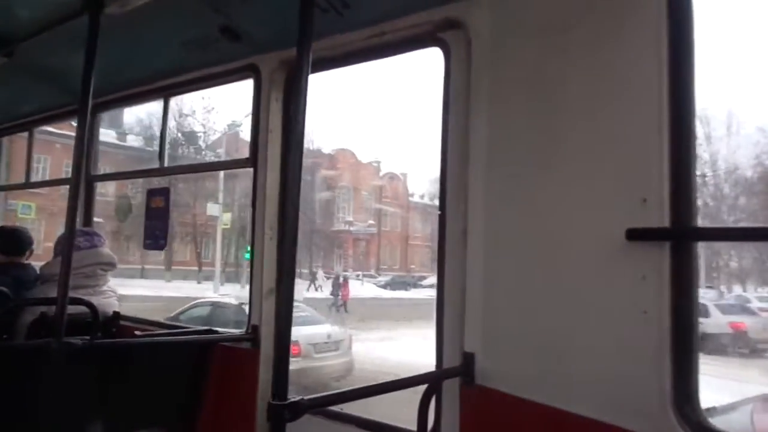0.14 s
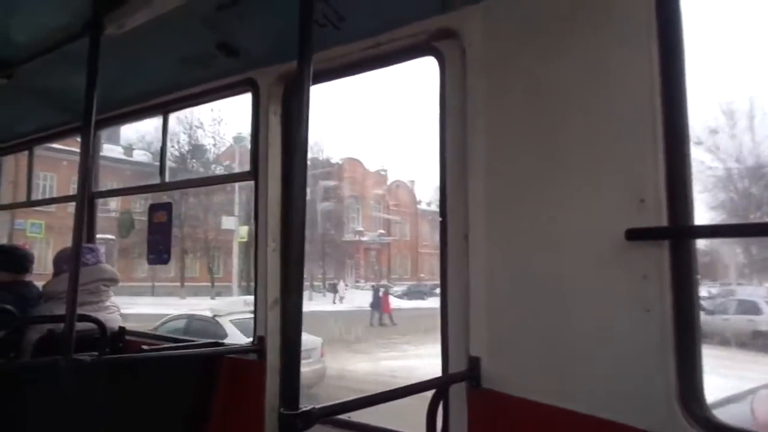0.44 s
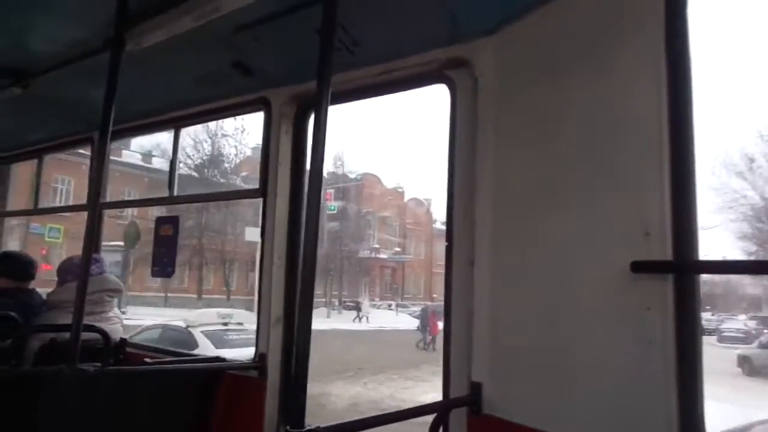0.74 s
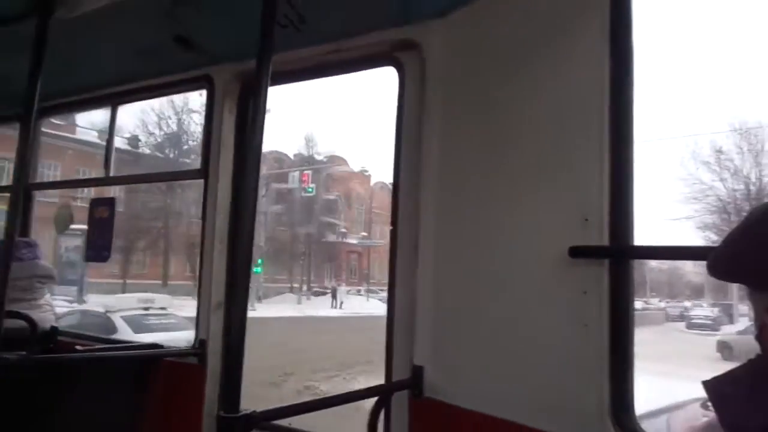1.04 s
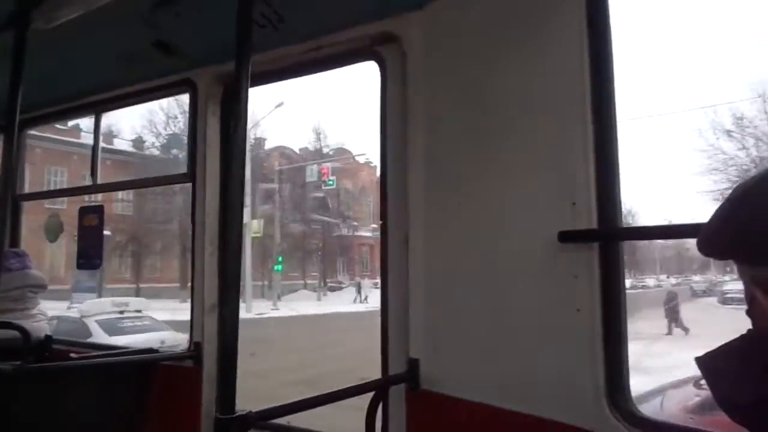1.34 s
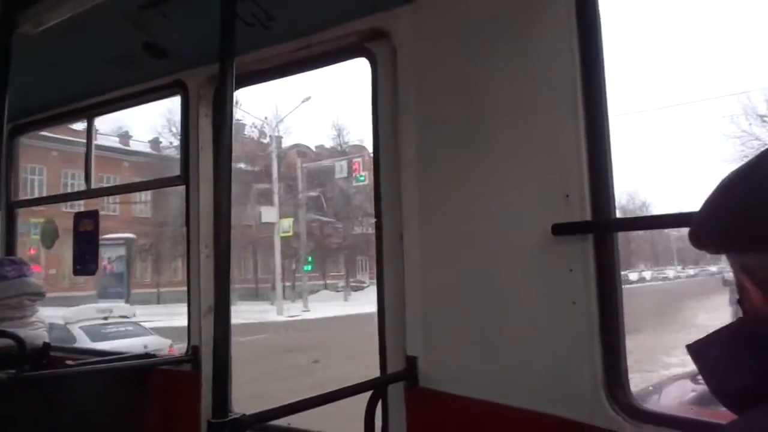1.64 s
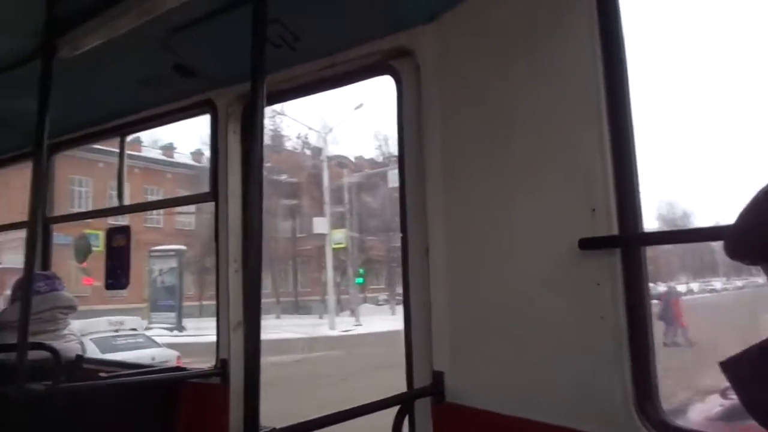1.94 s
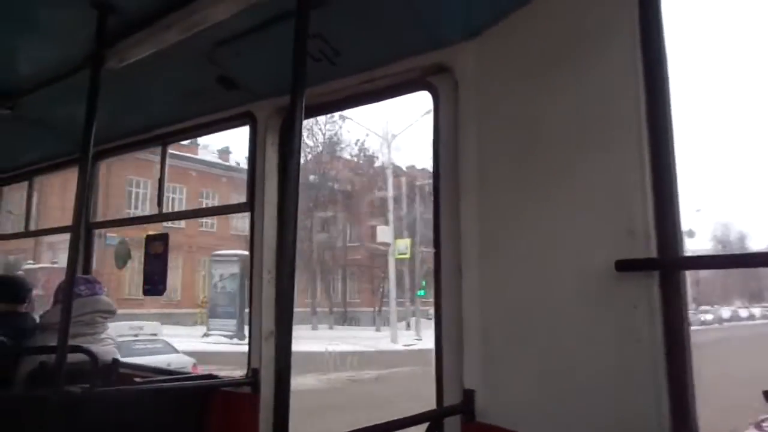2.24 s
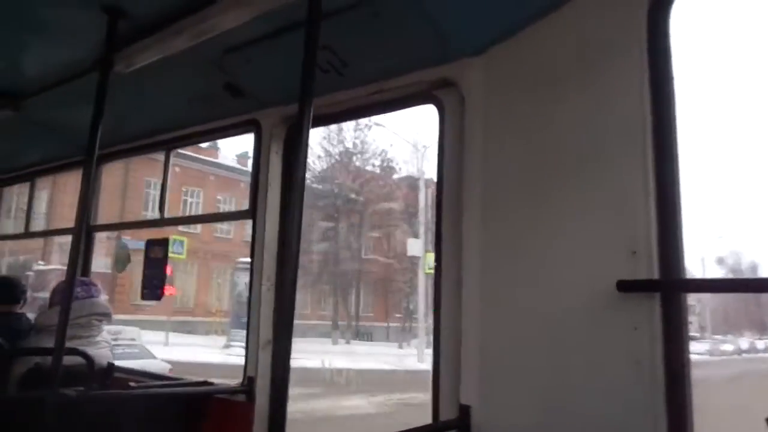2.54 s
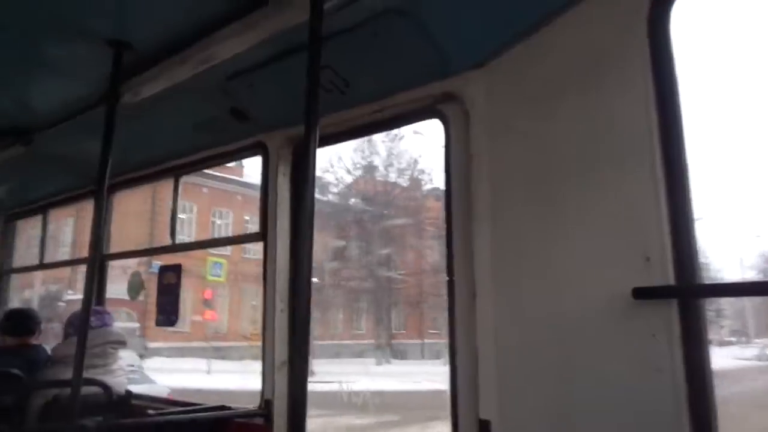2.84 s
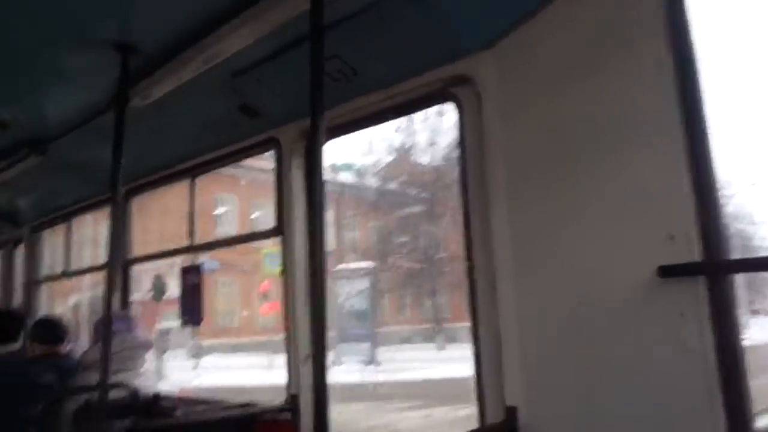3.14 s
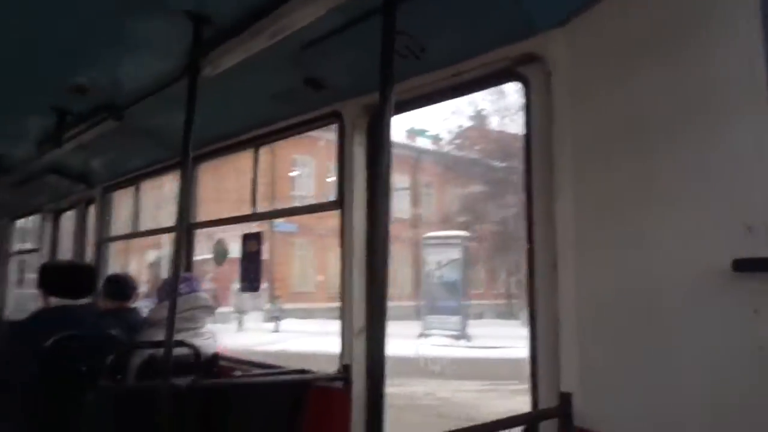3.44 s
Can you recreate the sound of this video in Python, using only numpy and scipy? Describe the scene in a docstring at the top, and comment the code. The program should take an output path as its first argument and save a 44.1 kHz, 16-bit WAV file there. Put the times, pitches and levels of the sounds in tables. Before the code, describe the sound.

A tram rumbles along rough track, heard from inside, with a low booming drone and wheel roar throughout. A faint motor whine fades out by 0.8 seconds. Windows and panels rattle and knock in short, irregular bursts. From about 0.9 seconds, wheels thud through the floor, hardest near 2.2, 2.5 and 3 seconds. The roar and rattling grow louder from 2 seconds to the end at about 3.6.

```python
"""Inside a tram on rough track, almost in mono. From the start, floor and walls boom at three low
resonances and the wheels roar; a faint motor whine is gone by 0.8 s. Throughout, jolts over rail
joints shake windows and panels into short rattles and knocks. From 0.9 s, wheel drops thud through
the floor. Roar and rattles grow louder towards the end."""
import sys
import numpy as np
from scipy import signal
from scipy.fft import rfft, irfft, next_fast_len
from scipy.io import wavfile
from scipy.ndimage import uniform_filter1d, map_coordinates

SR = 44100
rng = np.random.default_rng(int(sys.argv[2]) if len(sys.argv) > 2 else 0)


def transcribe(signal):
    """Save signal, clipped to [-1, 1], as a 16-bit WAV file at the path in sys.argv[1]."""
    frames = np.atleast_2d(signal).T
    limited = np.clip(frames, -1, 1)
    pcm = np.round(limited * 32767).astype(np.int16)
    wavfile.write(sys.argv[1], SR, pcm)


N = 158760

# floor and wall resonances: f/Hz, width/Hz
BOOM_MODES = [(67, 14.3), (89, 15), (113, 15.1)]
# their envelopes: t/s, then level/dB of each mode
BOOM_LEVELS = [(0.0, -56, -25, -37), (0.08, -36, -28, -33), (0.33, -27, -55, -36), (0.39, -39, -38, -47),
               (0.63, -26.5, -44, -27), (0.73, -52, -44, -30), (0.89, -22, -30, -31),
               (1.08, -28, -26.5, -33), (1.22, -28, -29, -24.5), (1.28, -30, -32, -26.5),
               (1.42, -27.5, -26, -35), (1.69, -21, -33, -26), (1.79, -24, -26, -29), (1.89, -15, -39, -29),
               (1.96, -32, -38, -25), (2.07, -18, -21, -23), (2.12, -24.5, -22, -28),
               (2.29, -21.5, -23, -14.5), (2.46, -19, -28.5, -40), (2.51, -29, -28, -17.5),
               (2.58, -19, -14.5, -23), (2.63, -31, -40, -24), (2.78, -25, -39, -17), (3.02, -33, -22, -27),
               (3.09, -21, -38, -12), (3.25, -21, -22.5, -28), (3.43, -24, -20, -22),
               (3.47, -37, -25, -14.5), (3.6, -19, -23, -25)]
# rolling noise: t/s, roar level/dB, hiss level/dB
ROAR_LEVELS = [(0, -28, -46), (.3, -27.5, -50), (.55, -26, -45.5), (.82, -26.5, -48), (1.07, -23.5, -43.5),
               (1.38, -25, -47.5), (1.62, -24.5, -44), (1.95, -23, -44), (2.17, -20, -41), (2.46, -21, -42),
               (2.78, -18, -40), (3.02, -17, -42), (3.17, -18, -35), (3.55, -21, -47), (3.6, -17, -48)]
# spectra of wheel roar, low rumble and hiss: f/Hz, relative density/dB
WHEEL_SPECTRUM = [(76, -85), (130, -8), (221, -12), (319, -8.5), (476, -9.5), (746, -12.5), (1100, -16.5),
                  (1270, -19.5), (2520, -22), (6000, -38), (7800, -47.5), (13200, -120)]
RUMBLE_SPECTRUM = [(8, -40), (20, 2), (28, -2), (40, 2), (52, -2), (90, -14.5), (130, 0), (160, -3.5),
                   (210, -10), (500, -120)]
HISS_SPECTRUM = [(1200, -120), (2000, -13), (3000, -2.5), (4300, -5), (6500, -3.5), (9000, -7),
                 (11500, -6.5), (13000, -16), (14200, -13), (15800, -28)]
# cabin shell resonances: f/Hz, width/Hz, lift/dB
SHELL_MODES = [(269.5, 33, 2.5), (304.4, 24, 4.5), (392.7, 8, 5), (487, 11, 3), (722, 70, 1.5),
               (1125, 45, 3), (1367, 320, 4)]
# motor tones: f/Hz, width/Hz, level/dB
MOTOR_TONES = [(743, 11, -38), (1050, 15, -38.5)]
# rattle bursts: peak t/s, level/dB, treble gain/dB, rise/s, fall/s (both to 1/e)
JOLT_BURSTS = [(.137, -23, -6.5, 0.053, 0.079), (0.465, -23, -4, 0.043, 0.07),
               (.61, -25.5, -7, 0.026, 0.04), (.905, -18.5, -7, 0.028, 0.049),
               (0.954, -18.5, -1.5, 0.027, 0.049), (1.12, -29, 5.5, 0.011, 0.034),
               (1.275, -28.5, 0.5, 0.042, 0.024), (1.73, -30, 2.5, 0.02, 0.068),
               (1.88, -24, -4, 0.067, 0.11), (2.019, -20.5, -1, 0.01, 0.11),
               (2.243, -15, -1.5, 0.038, 0.041), (2.315, -14.5, -4.5, 0.058, 0.13),
               (2.554, -15, 3.5, 0.05, 0.061), (2.66, -19, -1, 0.027, 0.046), (2.89, -18, -7, 0.08, 0.047),
               (2.97, -21, 0.5, 0.059, 0.053), (3.06, -14, -12, 0.043, 0.057),
               (3.115, -12.5, -5, 0.022, 0.018), (3.24, -15, -1.5, 0.094, 0.044),
               (3.34, -15, -1, 0.066, 0.094), (3.402, -14, 1, 0.018, 0.018), (3.48, -17, 3.5, 0.056, 0.093),
               (3.6, -18, -0.5, 0.037, 0.055)]
# rattling panels: f/Hz, relative density/dB
PANEL_SPECTRUM = [(80, -120), (150, -5.5), (250, -7.5), (385, -6), (800, -7.5), (1300, -12), (2000, -13.5),
                  (3500, -20.5), (5500, -28.5), (8500, -31.5), (11500, -32.5), (13000, -39), (14200, -48),
                  (15800, -54)]
# loose panels struck: t/s, level/dB, f/Hz
PANEL_KNOCKS = [(0.084, -13, 307), (.601, -10, 380), (.946, -9, 470), (2.236, -12, 783), (2.305, -9.5, 620),
                (2.325, -3.5, 389), (2.539, -3, 403), (2.865, -5, 370), (3.042, -6, 278), (3.445, -3, 1335)]
# wheels dropping on joints: t/s, relative level/dB
WHEEL_DROPS = [(0.864, -10), (1.218, -14), (1.385, -19), (1.501, -9.5), (2.238, 0.5), (2.538, -3),
               (3.044, 0)]
# floor modes rung by a drop: f/Hz, relative level/dB, T60/s
FLOOR_MODES = [(70.3, 10, 0.044), (107, 12, 0.081), (273, -8.5, 0.23)]
# spells of wider treble: start t/s, end t/s
WIDE_SPELLS = [(1.011, 1.076), (1.25, 1.57), (1.903, 2.044), (2.7, 3.16), (3.533, 3.64)]
# filter of the left-right difference: f/Hz, gain/dB
SIDE_RESPONSE = [(100, -39.5), (1000, -25.5), (3000, -14.5), (6000, -10), (9000, 3), (12000, -1),
                 (14000, -23)]


def amp(db):
    """Level to gain."""
    return 10 ** (np.asarray(db) / 20)


def unit(x):
    """Scale to rms 1."""
    return x / np.sqrt(np.mean(x ** 2) + 1e-20)


def shape(points):
    """Response from (f/Hz, level/dB) points, log frequency axis."""
    hz, db = np.transpose(points)
    return lambda f: amp(np.interp(np.log(f + 1), np.log(hz + 1), db))


def curves(rows):
    """Each column after t/s, interpolated per sample."""
    times_s, *columns = np.transpose(rows)
    return [np.interp(np.arange(N) / SR, times_s, column) for column in columns]


def wobble(rate_hz):
    """Smooth random curve through rate_hz knots a second."""
    knots = rng.standard_normal(int(N * rate_hz / SR) + 4)
    return map_coordinates(knots, [np.arange(N) * rate_hz / SR])


def filtered(x, response):
    """Apply response(f/Hz) by FFT."""
    size = next_fast_len(N + SR // 2)
    return irfft(rfft(x, size) * response(np.fft.rfftfreq(size, 1 / SR)), size)[..., :N]


def patchy_noise(depth_db):
    """White noise with random gain patches in time and frequency."""
    spectra = signal.stft(rng.standard_normal(N + 512), nperseg=512)[2]
    patches = uniform_filter1d(rng.standard_normal(spectra.shape), size=5, axis=0)
    patches = uniform_filter1d(patches, size=6, axis=1)
    return signal.istft(spectra * amp(depth_db * unit(patches)), nperseg=512)[1][:N]


def resonance(hz, width_hz):
    """Noise ringing in one narrow resonance, rms 1."""
    noise = rng.standard_normal(N)
    return unit(filtered(noise, lambda f: (1j * f * width_hz / (hz**2 - f**2 + 1j * f * width_hz)) ** 2))


def cabin_boom(evenness=0.55):
    """Track roughness keeps three cabin modes droning, wavering in pitch and level."""
    out = np.zeros(N)
    for level_db, (hz, width_hz) in zip(curves(BOOM_LEVELS), BOOM_MODES):
        ring = resonance(hz, width_hz)
        envelope = np.abs(signal.hilbert(ring)) + 0.041
        out += amp(level_db) * unit(ring / envelope ** evenness)
    return out


def wheel_roar(rumble_db=-7, flicker_db=0.6):
    """Steel wheels on rails: roar, broad rumble below, thin hiss on top."""
    roar_db, hiss_db = curves(ROAR_LEVELS)
    wheels = unit(filtered(patchy_noise(depth_db=1.5), shape(WHEEL_SPECTRUM)))
    rumble = amp(rumble_db) * unit(filtered(rng.standard_normal(N), shape(RUMBLE_SPECTRUM)))
    hiss_gain = amp(hiss_db + flicker_db * wobble(rate_hz=14))
    hiss = unit(filtered(patchy_noise(depth_db=2.2), shape(HISS_SPECTRUM)))
    return amp(roar_db) * (wheels + rumble) + hiss_gain * hiss


def cabin_shell(x):
    """The shell lifts passing sound at its resonances."""
    def lift_db(f):
        return sum(db / (1 + (2 * (f - hz) / width_hz) ** 2) for hz, width_hz, db in SHELL_MODES)
    return filtered(x, lambda f: amp(lift_db(f)))


def motor_whine(end_s=0.78, fade_s=0.1):
    """Two fuzzy motor tones die away as the tram starts to coast."""
    fade = np.clip((end_s - np.arange(N) / SR) / fade_s, 0, 1)
    return fade * sum(amp(db) * resonance(hz, width_hz) for hz, width_hz, db in MOTOR_TONES)


def panel_rattles(ticks_per_s=2200, spread_db=5, tick_share=0.31, crossover_hz=1660):
    """Each jolt shakes the panels into a swell of dense ticks and buzz, with its own brightness."""
    ticks = np.zeros(N)
    position, polarity, rank = rng.random((int(ticks_per_s * N / SR), 3)).T
    ticks[(position * N).astype(int)] = np.sign(polarity - 0.5) * amp(-spread_db * np.log(rank + 0.02))
    noise = unit(patchy_noise(depth_db=1.5))
    drive = np.sqrt(tick_share) * unit(ticks) + np.sqrt(1 - tick_share) * noise
    buzz = unit(filtered(drive, shape(PANEL_SPECTRUM)))
    treble = filtered(buzz, lambda f: 1 / (1 + (crossover_hz / (f + 1)) ** 2))
    t = np.arange(N) / SR
    low_power, treble_power = np.zeros(N), np.zeros(N)
    for peak_s, db, treble_db, rise_s, fall_s in JOLT_BURSTS:
        from_peak = np.where(t < peak_s, (peak_s - t) / rise_s, (t - peak_s) / fall_s)
        swell = amp(db) * np.exp(-from_peak ** 1.55)  # exponent: 1 cusp, 2 bell
        low_power += swell ** 2
        treble_power += (swell * amp(treble_db)) ** 2
    return np.sqrt(low_power) * (buzz - treble) + np.sqrt(treble_power) * treble


def panel_knocks(rise_s=0.0064, t60_s=0.068):
    """A loose panel struck by a jolt rings briefly at its own pitch."""
    out, t = np.zeros(N + SR), np.arange(SR // 4) / SR
    attack = 1 - np.exp(-t / rise_s)
    for start_s, db, hz in PANEL_KNOCKS:
        ring = np.sin(2 * np.pi * (hz * t + rng.random()))
        out[round(start_s * SR):][:len(t)] += amp(db - 60 * t / t60_s) * attack * ring
    return out[:N]


def floor_thuds(gain_db=-12, scatter_db=2.7, rise_s=0.0043, highpass_hz=55):
    """A wheel drops on a joint; the floor rings briefly."""
    out, t = np.zeros(N + SR), np.arange(SR // 4) / SR
    attack = 1 - np.exp(-t / rise_s)
    for start_s, db in WHEEL_DROPS:
        ring = sum(amp(mode_db + rng.normal(0, scatter_db) - 60 * t / t60_s) * np.sin(2 * np.pi * hz * t)
                   for hz, mode_db, t60_s in FLOOR_MODES)
        out[round(start_s * SR):][:len(t)] += amp(db + gain_db) * attack * ring
    return filtered(out[:N], lambda f: 1 / (1 + (highpass_hz / (f + 1)) ** 4))


def treble_spread(centre):
    """Side signal: a phase-scrambled copy of the centre widens the treble in spells."""
    t = np.arange(N) / SR
    spells = sum((t > start_s) & (t < end_s) for start_s, end_s in WIDE_SPELLS)
    gate = uniform_filter1d(spells.astype(float), size=800)
    spectra = signal.stft(np.pad(centre, (0, 1024)), nperseg=1024)[2]
    phasors = np.exp(2j * np.pi * rng.random(spectra.shape))
    scrambled = signal.istft(spectra * phasors, nperseg=1024)[1][:N]
    return gate * filtered(scrambled, shape(SIDE_RESPONSE))


def scene():
    """All sources, nearly alike left and right."""
    centre = cabin_boom() + cabin_shell(wheel_roar() + panel_rattles())
    centre += motor_whine() + panel_knocks() + floor_thuds()
    side = treble_spread(centre)
    return np.array([centre + side, centre - side])


def record(dry, ceiling=0.98, cutoff_hz=15000):
    """Soft clip, then brick-wall low-pass."""
    soft = dry / (1 + np.abs(dry / ceiling) ** 6) ** (1 / 6)
    return filtered(soft, lambda f: f < cutoff_hz)


dry = scene()
out = record(dry)
transcribe(out)
```